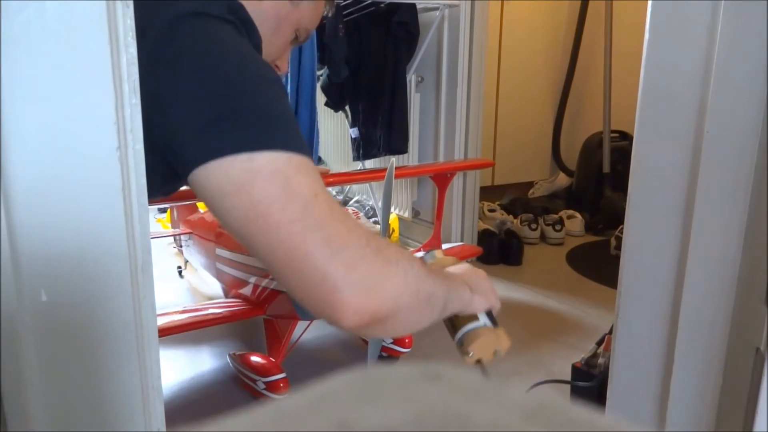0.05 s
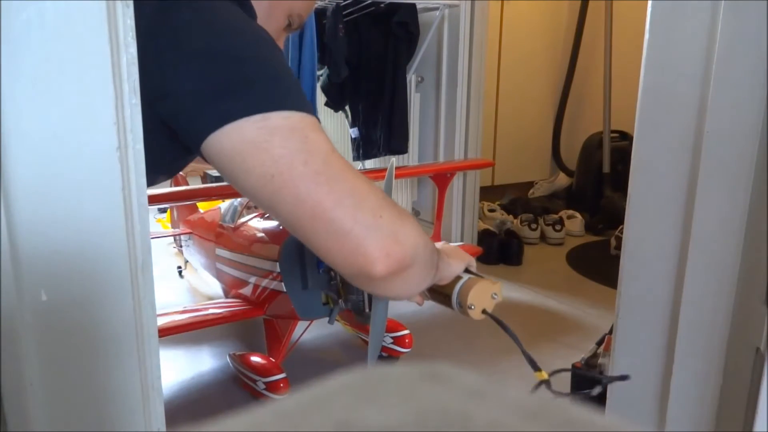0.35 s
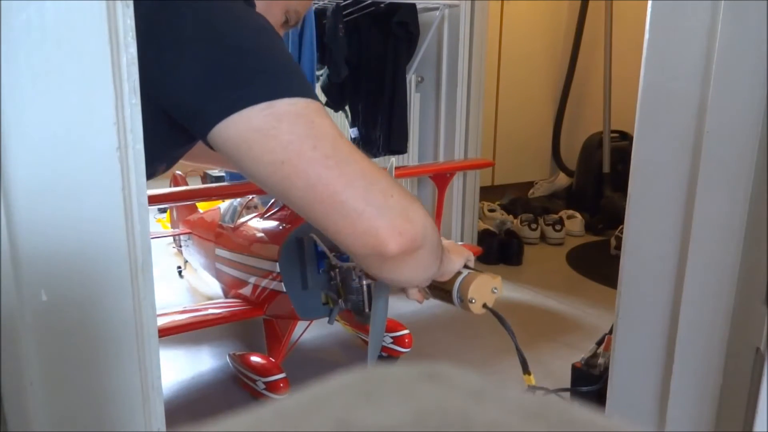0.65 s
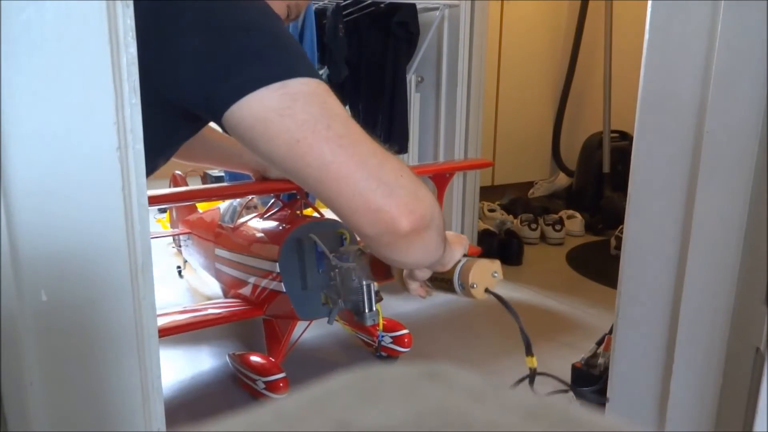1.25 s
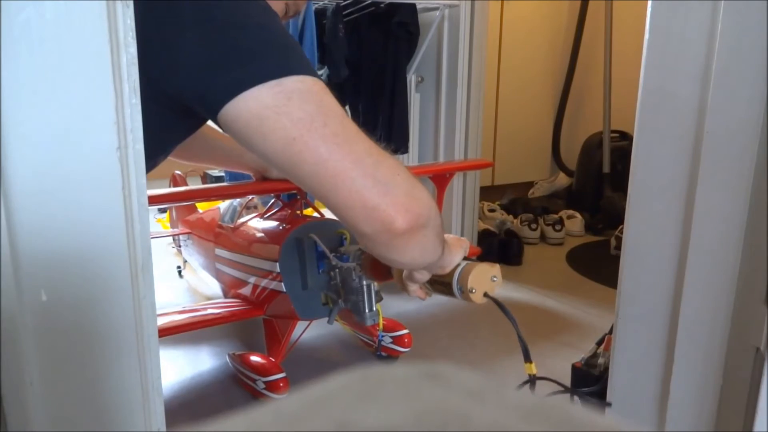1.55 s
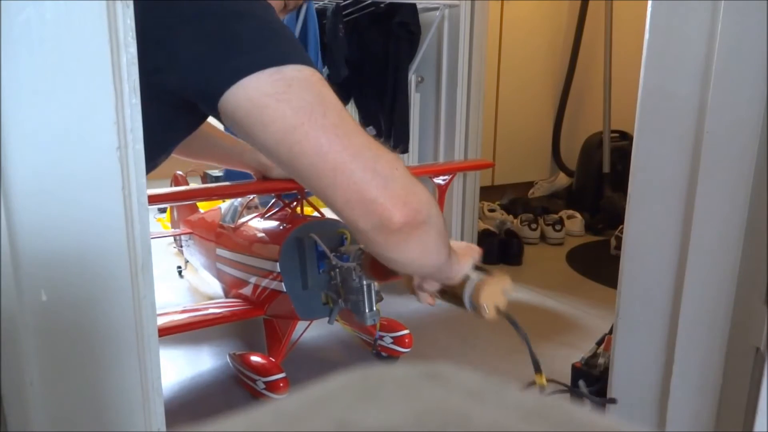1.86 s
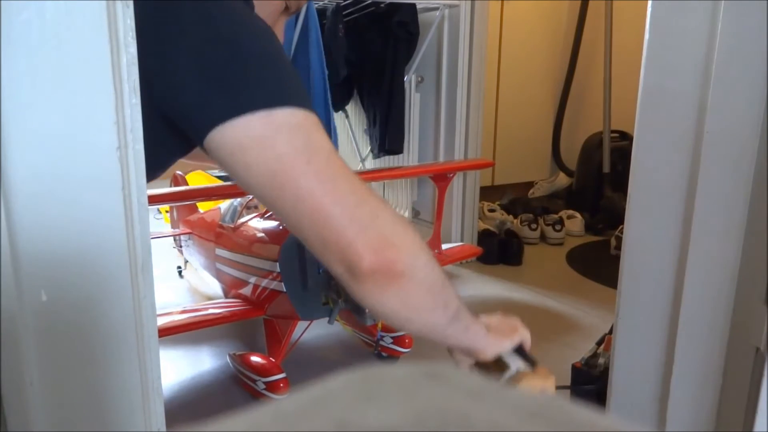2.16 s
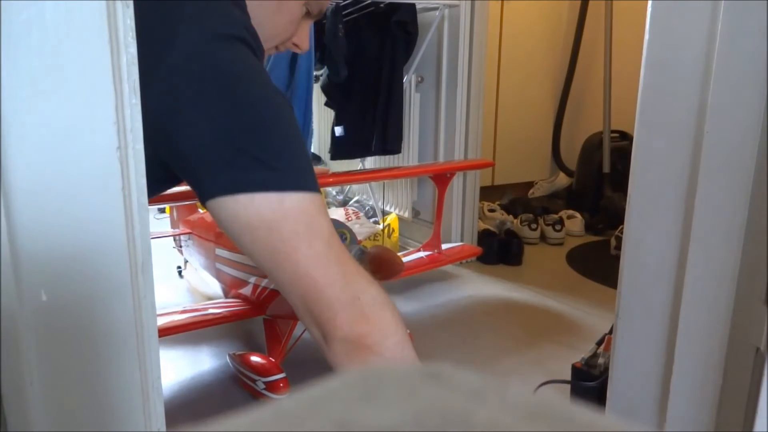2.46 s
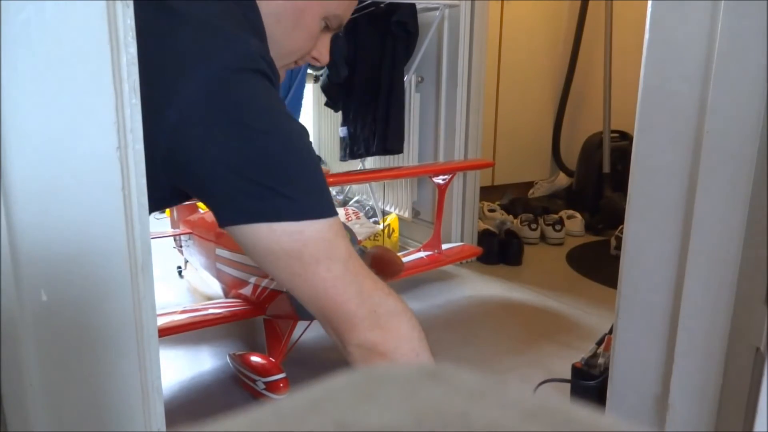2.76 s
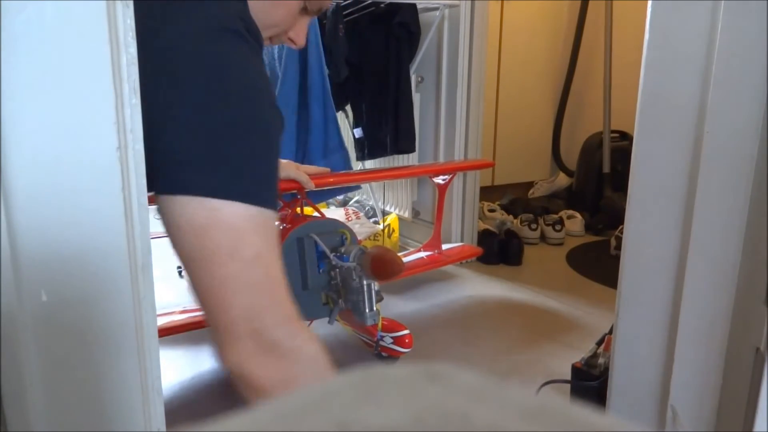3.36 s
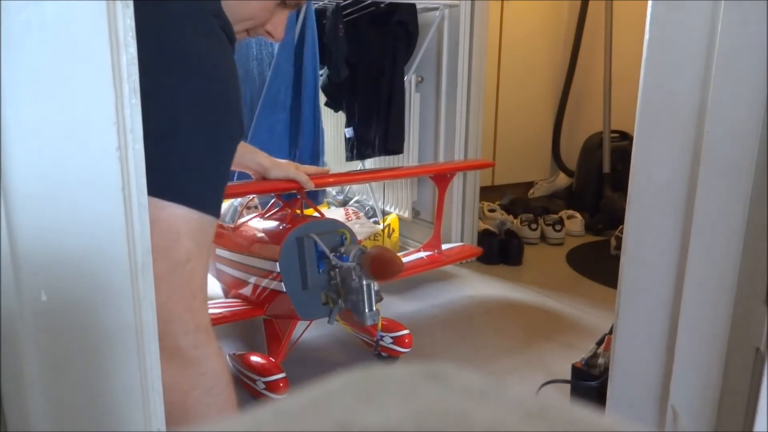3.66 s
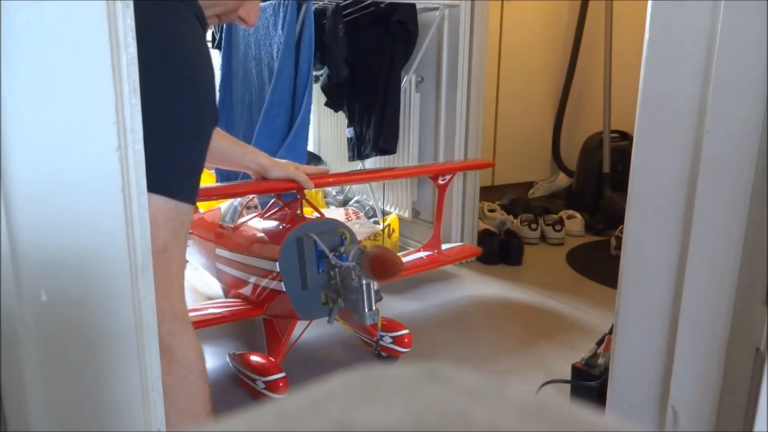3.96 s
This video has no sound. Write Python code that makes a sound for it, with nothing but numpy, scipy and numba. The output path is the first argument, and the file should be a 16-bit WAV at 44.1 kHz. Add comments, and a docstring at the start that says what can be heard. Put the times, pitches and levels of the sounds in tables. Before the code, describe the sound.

A small model aeroplane engine fires up indoors, close to the microphone. Light knocks and a short starter grind come first, then a second try brings it to a loud roar with rattling valves and sharp metallic cracks.

```python
"""Dull knocks, close by in a small hard-walled room: an electric starter meets the spinner of a model
aeroplane's four-stroke engine. It grinds once, stalls, then turns the engine until it catches.
Exhaust puffs boom in the room, the valve gear clatters and the propeller swishes. Two microphones
stand close to the engine, where its sharp metallic cracks make the recorder's limiter duck."""
import sys
import numpy as np
from scipy import signal
from scipy.fft import rfft, irfft
from scipy.io import wavfile
from scipy.ndimage import uniform_filter1d
from numba import njit

SR = 44100
rng = np.random.default_rng(int(sys.argv[2]) if len(sys.argv) > 2 else 0)


def dump_mix(stems):
    """Bounce the given channels to the path in sys.argv[1] as a 16-bit WAV at rate SR."""
    frames = np.atleast_2d(stems).T  # one column per channel
    limited = np.clip(frames, -1, 1)  # hard clip at full scale
    pcm = np.round(limited * 32767).astype(np.int16)
    wavfile.write(sys.argv[1], SR, pcm)


N = 176400


# engine speed, two crank turns to a cycle: time_s, cycles_per_s
ENGINE_SPEED = [(1.35, 10.15), (1.5, 18), (1.7, 23), (2.0, 24), (2.3, 20.75), (2.7, 18.4), (3.05, 17.2),
                (3.3, 18.4), (3.55, 19.15), (4, 19.2)]
# how hard the engine works: time_s, exhaust_db, clatter_db
ENGINE_EFFORT = [(1.27, -84, -74), (1.33, -45, -22.5), (1.43, -30, -20), (1.46, -23.5, -12),
                 (1.7, -17, -9.5), (2.0, -14.5, -10.5), (2.3, -22.5, -15.5), (3.0, -22, -14.5),
                 (4, -23.5, -14)]
# one cycle's exhaust puffs and valve-gear clicks: cycle_fraction, level_db
EXHAUST_PUFFS = [(0.042, -6), (.36, -13.5), (.7, -9)]
VALVE_CLICKS = [(.02, 7.5), (0.109, 1), (.19, 11), (0.268, 1.5), (0.348, 3), (0.458, 0.5), (0.538, -11),
                (0.681, 7.5), (0.768, -7.5), (0.882, -5)]
# exhaust and clatter from close by: frequency_hz, level_db
EXHAUST_SPECTRUM = [(25, -10), (60, -61), (95, -47), (125, -0.5), (150, -2), (190, 3.5), (230, 3.5),
                    (275, -19.5), (420, -8.5), (700, -29), (2000, -22)]
CLATTER_SPECTRUM = [(60, -35), (200, -14), (320, -1.5), (500, -1.5), (700, -4.5), (880, 0), (1080, -3.5),
                    (1270, 4), (1600, -0.5), (2100, -4.5), (2700, 1), (4100, -1), (5000, -4), (6700, -6),
                    (8300, -3.5), (10000, -5.5), (11500, -10), (13500, -18.5), (16000, -19.5)]
# resonances of engine and airframe: pitch_hz, width_hz, level_db
ENGINE_MODES = [(550, 18, 10), (852, 9, -7.5), (878, 19, -1.5), (1176, 25, -7.5), (1324, 48, -2.5),
                (1541, 61, -0.5), (1640, 66, -7), (1833, 14, 2.5), (2514, 24, 1.5), (2670, 44, -13.5),
                (4020, 57, -10.5), (7420, 84, -1.5), (8040, 114, 1.5), (8960, 62, -6)]
def engine():
    """Puffs, valve clicks and blade swish follow the crankshaft; returns the sound and the bare puffs."""
    cycles = np.cumsum(curve(ENGINE_SPEED)) / SR
    puffs = unit(bursts(each_cycle(cycles, EXHAUST_PUFFS, scatter_db=1.5), decay_s=0.0036))
    puffs *= undb(curve(ENGINE_EFFORT, column=1))
    clicks = unit(bursts(each_cycle(cycles, VALVE_CLICKS, scatter_db=3), decay_s=0.0015))
    blades = np.cos(2 * np.pi * 4 * cycles)  # four blade passes a cycle
    swish = undb(-3.5) * (1 + 0.37 * blades) * noise()
    drive = (clicks + swish) * undb(curve(ENGINE_EFFORT, column=2))
    clatter = colour(drive, CLATTER_SPECTRUM) + undb(-15.5) * resonate(drive, ENGINE_MODES)
    return undb(-8) * colour(puffs, EXHAUST_SPECTRUM) + clatter, puffs


# low resonances of exhaust and room: pitch_hz, width_hz, level_db
BOOM_MODES = [(128.6, 5.3, 4), (175, 11, -4), (237, 22, 0)]
def exhaust_boom(puffs, hum_hz=228):
    """The puffs set the exhaust and the room booming; a wavering hum rides on their level."""
    boom = undb(-6.5) * resonate(puffs, BOOM_MODES)
    phase = 2 * np.pi * np.cumsum(hum_hz * (1 + 0.0349 * drift(rate_hz=30))) / SR
    hum_db = curve(ENGINE_EFFORT, column=1) - 1.5 + 0.84 * drift(rate_hz=20)
    return boom + np.sin(phase) * undb(hum_db)


# metallic cracks of the running engine: start_s, level_db, pitch_hz
CRACK_EVENTS = [(1.7292, 4, 8600), (1.9007, 6, 10000), (2.024, 4.5, 8100), (2.111, 3, 9800),
                (2.2482, 5.5, 5300), (2.4452, 3, 8696), (2.5476, 2.5, 9900), (2.7137, 2.5, 9100),
                (2.824, 2.5, 6030), (2.9321, -5, 9720), (3.114, 1.5, 7800), (3.2245, 4, 9900),
                (3.2785, 1.5, 7564), (3.3273, -1.5, 9100), (3.5304, 5, 5522), (3.626, 1, 8094),
                (3.7966, 3, 7724), (3.9, 3, 8208)]
# a crack from close by: frequency_hz, level_db
CRACK_SPECTRUM = [(300, -25), (2000, -9), (4300, -7), (5500, 11), (7000, -0.5), (9700, 8), (11500, 1),
                  (13200, 4.5), (14500, -8), (17500, 2), (20000, 3.5)]
# the high chink in every crack: pitch_hz, width_hz, level_db
CHINK_MODE = [(13400, 1000, 0)]
def cracks(ring_width_hz=410):
    """Sharp blows on metal share a high chink, and each rings at a pitch of its own."""
    blows, rings = 0, 0
    for start_s, level_db, pitch_hz in CRACK_EVENTS:
        blow = bursts([(start_s, level_db)], decay_s=0.0011)
        ring = signal.lfilter(*signal.iirpeak(pitch_hz, pitch_hz / ring_width_hz, fs=SR), blow)
        blows += blow
        rings += ring * np.sqrt(SR / np.pi / ring_width_hz)  # as much power as the blow
    return colour(blows, CRACK_SPECTRUM) + undb(-9.5) * resonate(blows, CHINK_MODE) + undb(-4.5) * rings


# hard blows during the start: start_s, level_db
CLACK_EVENTS = [(.8075, 0.5), (.8235, -1), (.841, -19), (.9054, -8), (.9288, -7.5), (1.2875, -5),
                (1.3115, -7.5), (1.3683, -3), (1.3803, -5.5), (1.4032, 0.5), (1.4102, -1.5), (1.4556, 3.5),
                (1.4726, -3.5)]
# a clack from close by: frequency_hz, level_db
CLACK_SPECTRUM = [(80, -31), (250, -28), (700, -5.5), (1400, 8), (2000, 0), (2900, 5.5), (4300, 1.5),
                  (6500, -6), (8300, 0.5), (10500, -3), (13000, -21), (16000, -21)]
def clacks():
    """The starter bites and the engine kicks, ringing engine and airframe."""
    blows = bursts(CLACK_EVENTS, decay_s=0.0078)
    return colour(blows, CLACK_SPECTRUM) + undb(-14) * resonate(blows, ENGINE_MODES)


# grinding at the spinner: time_s, level_db
GRIND_LEVEL = [(.71, -72), (.74, -56), (.76, -46), (.77, -21), (.8, -30), (.83, -12), (.89, -31.5),
               (.93, -11.5), (.96, -29.5), (1.0, -48), (1.06, -101), (1.15, -50), (1.26, -66), (1.28, -30),
               (1.3, -17.5), (1.35, -32), (1.45, -22), (1.6, -47), (1.95, -20), (2.05, -70)]
# the grind from close by: frequency_hz, level_db
GRIND_SPECTRUM = [(40, -47), (100, -15.5), (170, -20), (215, -3), (280, -4.5), (400, 1), (600, 0.5),
                  (820, 5), (1100, -3.5), (1450, 5.5), (1950, -7.5), (2600, 3.5), (4300, -16), (5600, -4.5),
                  (8200, -18), (11500, -38), (12700, -17), (15000, -47)]
# resonances of the starter: pitch_hz, width_hz, level_db
STARTER_MODES = [(1520, 13, 1), (2574, 20, 7.5), (5250, 130, -16), (12500, 290, -7.5)]
def starter_grind(turn_hz=88):
    """The starter's cup chatters on the spinner, once each uneven turn."""
    wobble = unit(uniform_filter1d(noise(), size=2000))
    turns = np.cumsum(turn_hz * (1 + 0.0842 * wobble)) / SR
    rub = noise() * (1 + 0.32 * np.cos(2 * np.pi * turns)) * undb(curve(GRIND_LEVEL))
    return colour(rub, GRIND_SPECTRUM) + undb(-13) * resonate(rub, STARTER_MODES)


# dull knocks and light metal ticks at the aeroplane's nose: start_s, level_db
KNOCK_EVENTS = [(.0735, -17.5), (.077, -14), (.418, -31.5), (.463, -44), (.506, -55), (.664, -58),
                (.766, -20), (.7936, -21), (1.133, -64.5), (1.213, -46), (1.238, -31), (1.2685, -23)]
TICK_EVENTS = [(.418, -30), (.464, -42), (.506, -46), (.545, -50)]
# a knock from close by: frequency_hz, level_db
KNOCK_SPECTRUM = [(50, -45), (100, -23), (200, -14), (280, -7), (450, -7), (700, -4), (950, 2.5),
                  (1250, -5), (2000, -10), (2900, -1.5), (3400, -13), (4200, -12), (6000, -22),
                  (10500, -27), (16000, -38)]
# resonances of the ticking metal and the knocked airframe: pitch_hz, width_hz, level_db
TICK_MODES = [(229, 32, 1), (515, 60, 5), (960, 30, -2), (5870, 500, -7), (6700, 400, -18),
              (10000, 4000, -24)]
AIRFRAME_MODES = [(434, 10, -12), (913, 9, 3), (965, 7.1, 1), (1025, 12, -7), (2840, 33, -9),
                  (3320, 16, -9)]
def starter_knocks():
    """The starter knocks and ticks as it is seated; returns these taps and the airframe's ring."""
    blows = bursts(KNOCK_EVENTS, decay_s=0.0044)
    ticks = resonate(bursts(TICK_EVENTS, decay_s=0.0048), TICK_MODES)
    return colour(blows, KNOCK_SPECTRUM) + ticks, undb(-5) * resonate(blows, AIRFRAME_MODES)


# hiss band of the slipping cup: pitch_hz, width_hz, level_db
SCRAPE_BAND = [(6300, 2700, 0)]
def starter_scrape(peak_s=0.83, swell_s=0.022):
    """A short, faint hiss as the starter's cup first slips."""
    swell = np.exp(-((np.arange(N) / SR - peak_s) / swell_s) ** 2)
    hiss = resonate(resonate(noise(), SCRAPE_BAND), SCRAPE_BAND)
    return undb(-40) * swell * unit(hiss)


def wall_reflections(low_t60_s=0.56, treble_t60_s=0.32, top_t60_s=0.086):
    """The hard walls answer an impulse with dense echoes, even in colour; the highest die soonest."""
    t = np.arange(N) / SR
    grain = noise()
    low = signal.sosfilt(signal.butter(1, 3500, fs=SR, output="sos"), grain)
    top = signal.sosfiltfilt(signal.butter(4, 11500, "high", fs=SR, output="sos"), grain - low)
    bands = [(low, low_t60_s), (grain - low - top, treble_t60_s), (top, top_t60_s)]
    tail = sum(band * undb(-60 * t / t60_s) for band, t60_s in bands)
    spectrum = rfft(tail * np.minimum(t / .004, 1))  # echoes build up over 4 ms
    smooth_magnitude = np.sqrt(uniform_filter1d(np.abs(spectrum) ** 2, size=160))
    return irfft(spectrum / smooth_magnitude, N)[:SR]


def room_echoes(sound, drift_hz=0.3):
    """Two sets of wall echoes slowly trade places; returns mid and side."""
    first, second = (signal.fftconvolve(sound, wall_reflections())[:N] for _ in range(2))
    echoes = (first + 1j * second) * np.exp(2j * np.pi * drift_hz * np.arange(N) / SR)
    return echoes.real, echoes.imag


# the room's background at the microphones: frequency_hz, level_db
ROOM_TONE_SPECTRUM = [(24, -57), (40, -31), (242, -11), (389, 1.5), (1170, -8.5), (1790, -10.5), (1930, -3),
                      (2080, -11), (7060, -15), (8010, -16.5), (12200, -23.5), (15700, -29)]
def room_tone():
    """Faint, steady noise behind the engine."""
    return undb(-45.5) * colour(noise(), ROOM_TONE_SPECTRUM)


def undb(db):
    """Decibels to gain."""
    return 10 ** (np.asarray(db) / 20)


def unit(x):
    """Scale to rms 1."""
    return x / np.sqrt(np.mean(x ** 2))


def noise():
    """White noise."""
    return rng.standard_normal(N)


def drift(rate_hz):
    """Smooth random wander, rms 1."""
    span = int(SR / rate_hz)
    steps = np.repeat(rng.standard_normal(N // span + 1), span)
    return unit(uniform_filter1d(uniform_filter1d(steps, span), span)[:N])


def curve(table, column=1):
    """One column of a control table at every sample."""
    rows = np.array(table, float)
    return np.interp(np.arange(N) / SR, rows[:, 0], rows[:, column])


def colour(x, points):
    """Causal filter through (frequency_hz, level_db) points; keeps the power of white noise."""
    hz, db = np.array(points, float).T
    f = np.fft.rfftfreq(2 * N, 1 / SR)
    magnitude = unit(undb(np.interp(np.log(f + 1), np.log(hz), db)))
    cepstrum = irfft(np.log(magnitude))
    cepstrum[1:N] *= 2  # fold to minimum phase
    cepstrum[N + 1:] = 0
    return irfft(rfft(x, 2 * N) * np.exp(rfft(cepstrum)))[:N]


def resonate(x, modes):
    """Bank of resonances; keeps the power of white noise."""
    f = np.fft.rfftfreq(2 * N, 1 / SR)
    response = sum(undb(db) * 1j * f * width / (hz ** 2 - f ** 2 + 1j * f * width)
                   for hz, width, db in modes)
    return irfft(rfft(x, 2 * N) * response / np.sqrt(np.mean(np.abs(response) ** 2)))[:N]


def bursts(events, decay_s):
    """A sudden, quickly dying burst of noise at each (start_s, level_db)."""
    times, db = np.array(events).T
    onsets = np.bincount(np.clip(times * SR, 0, N).astype(int), undb(db) ** 2, N + 1)[:N]
    power = signal.lfilter([1], [1, -np.exp(-2 / (decay_s * SR))], onsets + 1e-18)
    return np.sqrt(power) * noise()


def each_cycle(cycles, pattern, scatter_db, jitter_s=0.0015):
    """Repeat a pattern once an engine cycle, uneven in time and strength."""
    fraction, db = np.array(pattern).T
    count = int(cycles[-1]) + 1
    places = np.arange(count)[:, None] + fraction
    times = np.interp(places, cycles, np.arange(N) / SR, right=2 * N / SR)
    times += jitter_s * rng.standard_normal(places.shape)
    levels = db + scatter_db * rng.standard_normal(places.shape)
    return np.column_stack([times.ravel(), levels.ravel()])


# side level of the echoes and room tone, narrow in the lows, the side almost gone near 13 kHz: frequency_hz,
# side_db
STEREO_WIDTH = [(40, -20), (125, -22), (250, -10.5), (500, -3), (1000, 6), (4000, 4.5), (8000, 4.5),
                (10500, 0.5), (13000, -33), (16000, -19)]
def scene():
    """Engine and starter centred before two close microphones; echoes and room tone give the width."""
    motor, puffs = engine()
    taps, airframe_ring = starter_knocks()
    direct = motor + starter_grind() + starter_scrape() + taps + cracks()
    kicks = clacks()
    room_gain = undb(3)
    echo_mid, echo_side = room_echoes(room_gain * (direct + undb(-8) * kicks))
    trim = 1 / np.sqrt(1 + room_gain ** 2)  # offsets the power the echoes add
    mid = trim * (direct + kicks + echo_mid) + exhaust_boom(puffs) + airframe_ring + room_tone()
    side = undb(-19) * colour(trim * echo_side + room_tone(), STEREO_WIDTH)
    return np.array([mid + side, mid - side])


@njit
def hold_peaks(level, fall):
    """Follow rises at once and falls slowly."""
    held, peak = np.empty(len(level)), 0.
    for i in range(len(level)):
        peak = max(level[i], peak * fall)
        held[i] = peak
    return held


def record(dry):
    """A fast limiter, led by the left microphone, holds the roar down; peaks clip and the top is cut."""
    limit_db, detect_s, release_s = -9.5, 0.0018, 0.066
    ceiling, top_hz = 0.93, 15850
    level = np.sqrt(np.abs(uniform_filter1d(dry[0] ** 2, int(detect_s * SR))))
    held = hold_peaks(level, np.exp(-1 / (release_s * SR)))
    gain = 1 / np.maximum(held / undb(limit_db), 1)
    clipped = np.clip(dry * gain, -ceiling, ceiling)
    return signal.sosfilt(signal.ellip(12, .1, 80, top_hz, fs=SR, output="sos"), clipped)


dry = scene()
out = record(dry)
dump_mix(out)
```